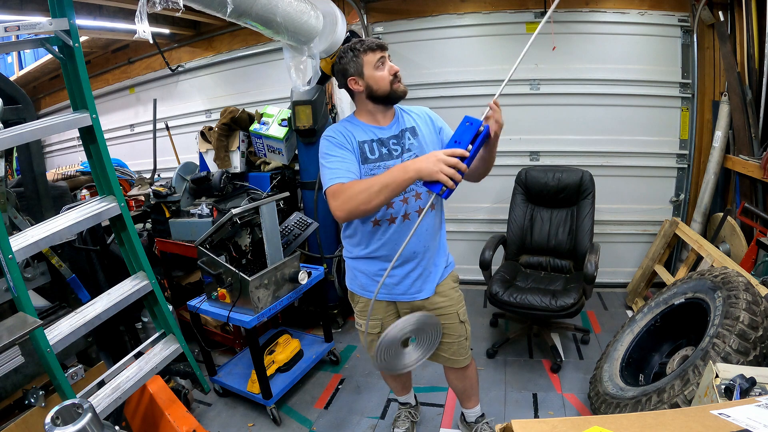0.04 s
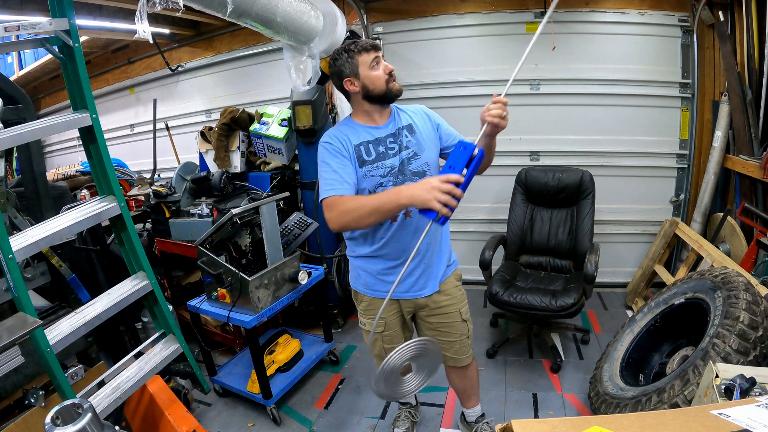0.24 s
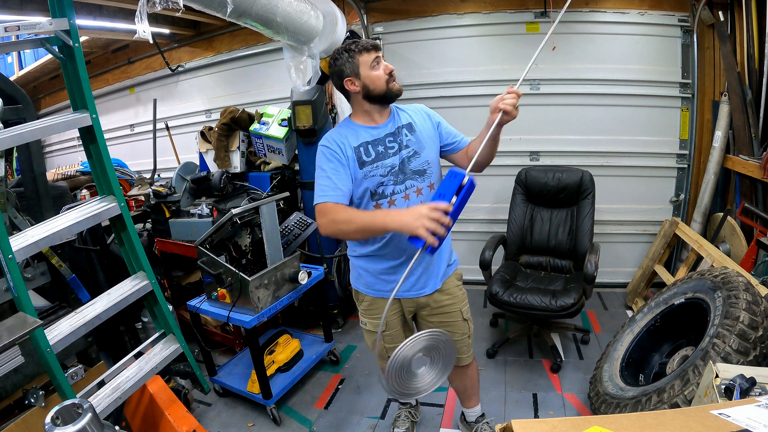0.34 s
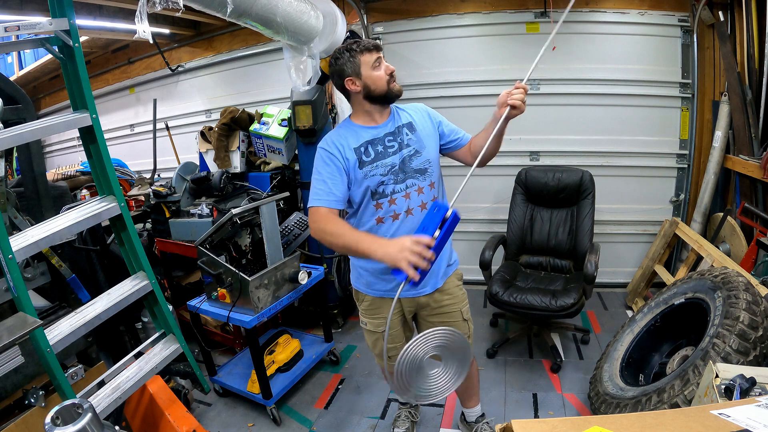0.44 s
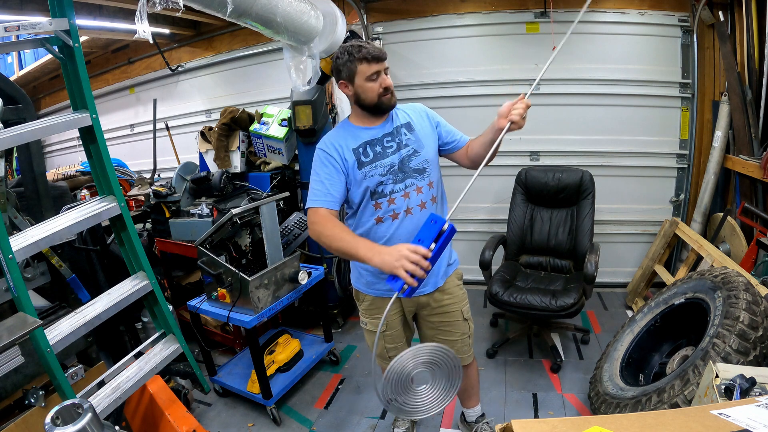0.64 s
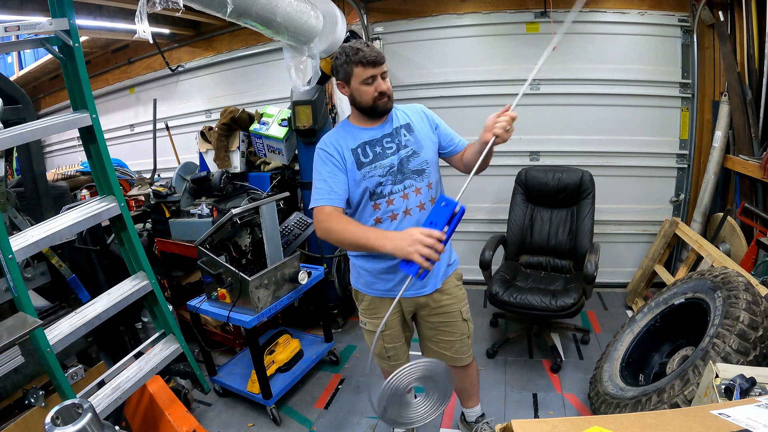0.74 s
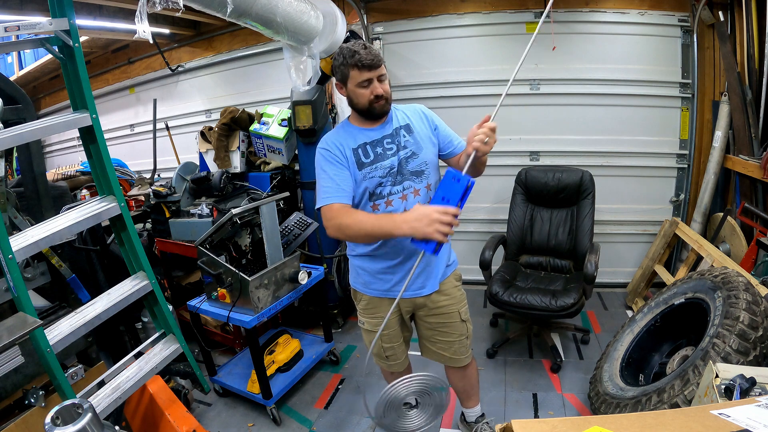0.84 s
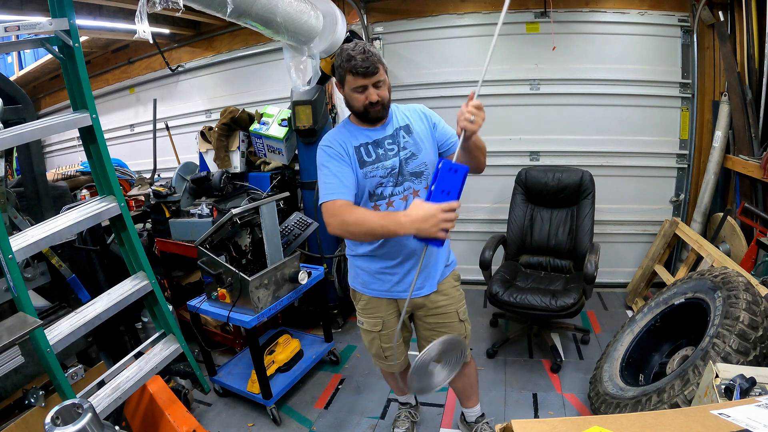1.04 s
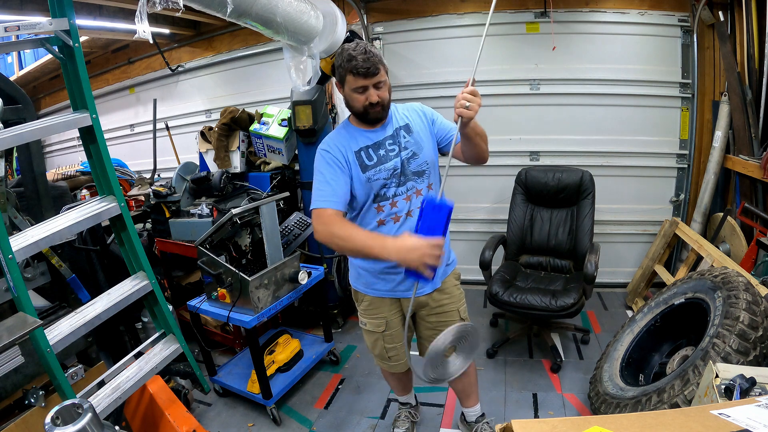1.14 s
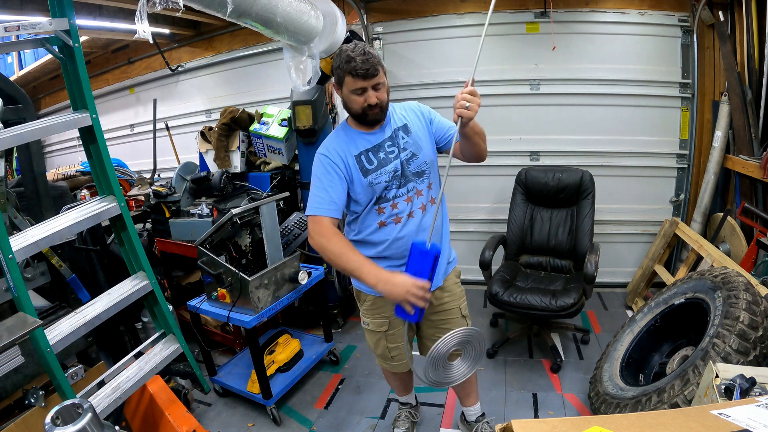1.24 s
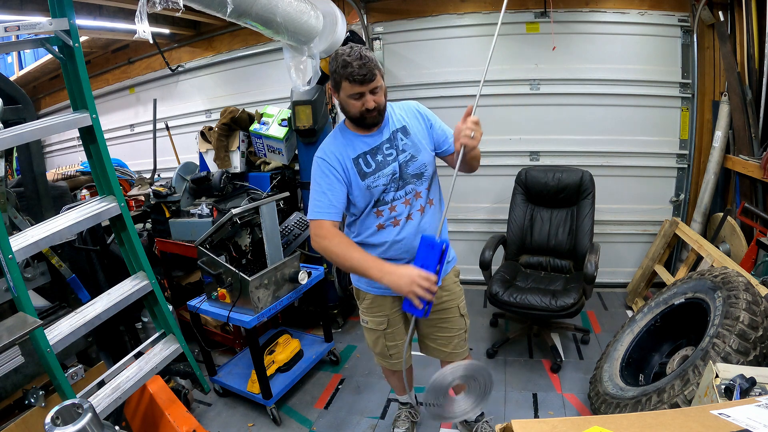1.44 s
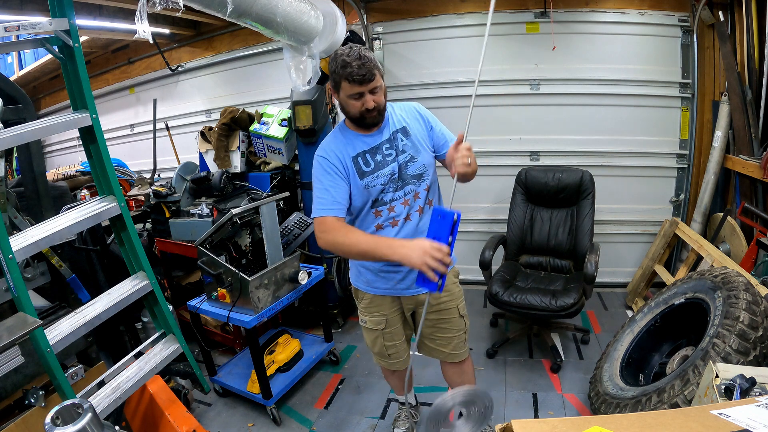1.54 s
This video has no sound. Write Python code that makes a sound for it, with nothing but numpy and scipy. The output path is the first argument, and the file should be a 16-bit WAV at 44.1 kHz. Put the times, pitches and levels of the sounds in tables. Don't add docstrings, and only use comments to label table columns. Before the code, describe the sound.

A hanging coil of thin aluminium tube clatters and rings throughout, in irregular bright clashes, busy around 0.2 to 0.9 seconds, with a sharp clank at 1.03. Rollers scrape grittily along the tube, swelling and easing, with brief squeaks. At 1.17 the tube knocks a sheet-metal door: a low boom with fast bounces, then jangling until 1.3 and quieter scraping. Echoing garage, faint hum, microphones metres away.

```python
import sys
import numpy as np
from scipy import signal
from scipy.fft import rfft, irfft
from scipy.io import wavfile
from scipy.ndimage import uniform_filter1d

SR = 44100
rng = np.random.default_rng(int(sys.argv[2]) if len(sys.argv) > 2 else 0)


def volts_from_db(level):
    exponent = np.asarray(level, float) / 20
    return 10 ** exponent


def generate_wav(sig):
    pcm = np.round(np.clip(np.atleast_2d(sig).T, -1, 1) * 32767).astype(np.int16)
    wavfile.write(sys.argv[1], SR, pcm)


N = 70560


def evened(x):
    return x / np.sqrt(np.mean(x ** 2) + 1e-20)


def read(points, hz):
    f, value = np.transpose(points)
    return np.interp(np.log(hz + 1), np.log(f + 1), value)


def add(mix, s, sound):
    part = mix[round(s * SR):][:len(sound)]
    part += sound[:len(part)]


def colour(x, points):
    gain = volts_from_db(read(points, np.fft.rfftfreq(2 * N, 1 / SR)))
    return irfft(rfft(x, 2 * N) * gain)[..., :N]


def resonate(x, hz, width):
    r = np.exp(-np.pi * width / SR)
    top = [(1 - r * r) / 2, 0, (r * r - 1) / 2]
    return signal.lfilter(top, [1, -2 * r * np.cos(2 * np.pi * hz / SR), r * r], x)


def drift(size):
    return evened(uniform_filter1d(uniform_filter1d(rng.standard_normal(N), size), size))


def air():
    # f/Hz, level/dB
    hum = [(25, -20.5), (60, -15), (98, -36), (140, -12.5), (231, -12.5), (400, -22), (3000, -13),
           (8000, -33.5)]
    a, b = colour(rng.standard_normal((2, N)), hum + [(15000, -66)])
    low = np.std(colour(a, [(90, -60), (100, 0), (400, 0), (440, -60)]))
    return volts_from_db(-62) * np.array([a + .3 * b, a - .3 * b]) / low


def garage(x):
    # f/Hz, t60/s
    decay = [(100, 0.35), (500, 0.52), (1500, 0.45), (4000, 0.32), (10000, 0.17)]
    # f/Hz, likeness 0 to 1
    likeness = [(60, 1), (180, 0.86), (550, 0.89), (1650, 0.82), (4970, 0.65), (15000, 0.92)]
    taps = np.zeros((2, SR // 2))
    at = np.arange(200, SR // 2 - 20, 20)
    at = at + rng.integers(0, 20, (2, len(at)))
    np.put_along_axis(taps, at, rng.choice([-1., 1.], at.shape), 1)
    hz, t, z = signal.stft(taps, SR, nperseg=256)
    same = np.clip(read(likeness, hz) - .15, 0, 1)[:, None]
    z = np.array([z[0], same * z[0] + np.sqrt(1 - same ** 2) * z[1]])
    dying = volts_from_db(-60 * t / read(decay, hz)[:, None])
    tail = signal.istft(z * dying, SR, nperseg=256)[1]
    return signal.fftconvolve(x[None], tail / np.linalg.norm(tail[0]), axes=1)[:, :N]


def door():
    # t/s, level/dB
    knocks = [
        (1.166, -17.5),
        (1.1774, -21.5),
        (1.1972, -22),
        (1.2193, -33.5),
        (1.2381, -27),
    ]
    # f/Hz, level/dB, t60/s
    modes = [(103, -17, 0.15), (129.9, -4, 0.42), (142, -15, 0.38), (169, -1.5, 0.12), (185.3, 1.5, 0.17),
             (198.8, -3, 0.18), (225.4, -2, 0.17), (247, -4.5, 0.25), (267.9, 2.5, 0.16), (285.6, -4, 0.15),
             (330, -41, 0.058), (402, -8.5, 0.089)]
    # t/s, f/Hz, level/dB, rise/s, t60/s
    settle = [
        (1.3, 192, -25.5, 0.015, 0.27),
        (1.365, 205, -40.5, 0.019, 0.29),
        (1.26, 150, -31.5, 0.017, .5),
        (1.42, 170, -43, 0.026, .6),
    ]
    # f/Hz, level/dB
    shake_colour = [(25, -10), (45, -10.5), (80, 2), (110, -9), (150, -34.5)]
    contact_s = 1.163
    t, out = np.arange(30000) / SR, np.zeros(N)

    boom = np.zeros(len(t))
    for hz, db, t60 in modes:
        flap = 4.5 * np.minimum(t / .05, 1) * drift(size=900)[:len(t)]
        boom += volts_from_db(db - 60 * t / min(t60, .5) + flap) * np.sin(2 * np.pi * hz * t)
    blow = np.hanning(round(0.0017 * SR))
    boom = np.convolve(boom, blow / blow.sum())
    boom = signal.lfilter(*signal.butter(4, 118, "high", fs=SR), boom)
    for s, db in knocks:
        add(out, s, -volts_from_db(db) * boom)

    for s, hz, db, rise, t60 in settle:
        add(out, s, np.sin(2 * np.pi * hz * t) * np.minimum(t / rise, 1) * volts_from_db(db - 60 * t / t60))

    shake = evened(colour(rng.standard_normal(N), shake_colour))[:len(t)]
    add(out, contact_s, shake * np.minimum(t / 0.064, 1) * volts_from_db(-28.5 - 60 * t / 0.64))

    # level/dB, f/Hz, width/Hz, t60/s
    tick, body, rap = (-18, 2750, 1300, 0.055), (-27.5, 726, 390, 0.22), (-23, 1640, 570, 0.081)
    for db, hz, width, t60 in (tick, body, rap):
        band = resonate(resonate(rng.standard_normal(len(t)), hz, width), hz, width)
        add(out, contact_s, evened(band) * volts_from_db(db - 60 * t / t60))
    return out


def rollers():
    # t/s, level/dB, brightness/(dB per octave)
    effort = [(0, -52, 8), (.022, -70, 17), (.06, -41.5, -4), (.18, -49, 9), (.3, -37, -0.5),
              (.33, -34.5, 4), (.43, -31, -6.5), (.53, -34, 1), (.6, -40.5, 6), (.8, -33.5, -1),
              (.9, -30.5, 0.5), (.97, -42, 7), (1.028, -37, -13), (1.128, -30.5, 2.5), (1.35, -48, -25),
              (1.446, -54.5, 7), (1.468, -38.5, 5), (1.6, -34.5, -4.5)]
    # f/Hz, level/dB
    scrape_colour = [(180, -57), (300, -10), (781, -14), (1000, -9), (1200, -6.5), (1540, -2), (3130, -0.5),
                     (11700, -15.5), (15500, -69)]
    # f/Hz, width/Hz, level/dB
    tube = [
        (1650, 330, 0),
        (2200, 150, -8),
        (3150, 700, 1),
        (4150, 200, -8),
        (5100, 300, -6),
        (7450, 200, -12),
    ]
    # t/s, low bands/dB, high bands/dB
    answers = [
        (0, -8, -2),
        (.3, -6, 0.5),
        (.5, -8, -8.5),
        (.6, -6, -2.5),
        (.8, -9.5, -9),
        (.93, 0, -7),
        (1.0, -16, -9),
        (1.45, -1.5, -4.5),
        (1.6, -0.5, 1),
    ]
    t = np.arange(N) / SR
    ticks = rng.random(N) < 5000 / SR
    tick_level = volts_from_db(3.5 * np.minimum(rng.exponential(1, N), 3))
    grit = rng.standard_normal(N) * (0.25 + tick_level * ticks)
    grit = grit * volts_from_db(2.5 * drift(size=200))

    at, *answer = np.transpose(answers)
    wall = np.zeros(N)
    for hz, width, db in tube:
        patches = 3 * drift(size=500)
        strength = volts_from_db(db + np.interp(t, at, answer[hz > 2500]) + patches)
        wall += 0.61 * strength * evened(resonate(grit, hz, width))

    sound = evened(colour(grit, scrape_colour)) + volts_from_db(-0.5) * wall
    treble = colour(sound, [(3000, -19), (6000, 0)])
    s, level_db, tilt = np.transpose(effort)
    sound = sound + (volts_from_db(np.interp(t, s, tilt)) - 1) * treble
    return volts_from_db(np.interp(t, s, level_db)) * evened(sound)


def singing():
    # t/s, length/s, f/Hz, level/dB
    songs = [
        (1.235, .05, 4850, -32),
        (.885, .03, 8400, -41),
        (.93, .045, 1640, -40),
        (.49, .045, 1125, -39),
        (.315, .03, 1600, -38),
        (.44, .05, 1650, -36),
        (1.49, .1, 3250, -43),
        (.66, .04, 4800, -37),
    ]
    out = np.zeros(N)
    for s, length, hz, db in songs:
        n = round(length * SR)
        tone = evened(resonate(rng.standard_normal(8000), hz, 65)[-n:])
        swell = np.sin(np.pi * np.arange(len(tone)) / n) ** .6
        add(out, s, volts_from_db(db) * tone * swell)
    return out


def rings():
    # t/s, f/Hz, level/dB, t60/s
    turns = [(.1156, 2930, -40.5, .18), (0.1162, 3370, -34, 0.14), (.1156, 5090, -42, .2),
             (.191, 3600, -25, 0.076), (.191, 5150, -33.5, 0.16), (.191, 7385, -33.5, 0.23),
             (.191, 6390, -31, 0.087), (0.606, 4150, -42, .2), (.6054, 1780, -41, 0.14),
             (0.659, 3150, -39, 0.082), (.66, 8360, -33, .12), (.672, 5050, -32, 0.15),
             (.4543, 4700, -30, 0.14), (.4543, 5150, -31, .12), (.4914, 4200, -29, 0.11),
             (.4914, 3650, -34, 0.09), (1.25, 4890, -29.5, 0.25), (.7571, 4200, -32.5, 0.13),
             (.775, 3650, -33, .15), (.8782, 3700, -32, 0.12), (1.034, 1665, -35, 0.18),
             (1.0339, 2185, -32.5, 0.47), (1.033, 2823, -37.5, 0.26), (1.0339, 3340, -24, .15),
             (1.033, 4100, -36, .2), (1.0339, 5115, -33, 0.24), (1.0335, 7472, -37, 0.3),
             (1.033, 9550, -44, .06), (1.0339, 11300, -27, .08), (1.0339, 12300, -35, 0.077),
             (1.2879, 2700, -35.5, 0.23), (1.2882, 1654, -31, 0.09)]
    t, out = np.arange(12000) / SR, np.zeros(N)
    for s, hz, db, t60 in turns:
        gap, phase = rng.random(2)
        second_hz = hz + 60 * (2 * gap - 1)
        pair = np.sin(2 * np.pi * hz * t) + 0.83 * np.sin(2 * np.pi * (second_hz * t + phase))
        rasp = 4 * drift(size=90)[:len(t)]
        add(out, s, pair * np.minimum(t / .002, 1) * volts_from_db(db - 60 * t / t60 + rasp))
    return out


def coil(count=800):
    # t/s, level/dB, brightness/(dB per octave), chatter/s
    clashes = [(0.024, -26.5, -2, 0.003), (0.0497, -27.5, -1.5, 0.0061), (0.1155, -21, -2.5, 0.0071),
               (0.191, -14.5, 2.5, 0.004), (0.2677, -26, 0.5, 0.0072), (0.3029, -23.5, -3.5, 0.0055),
               (0.4371, -15.5, 2, 0.014), (0.4543, -17.5, -0.5, 0.0079), (0.4918, -13.5, 1, 0.0082),
               (0.5088, -65, -22, 0.0094), (0.6055, -18.5, 2, 0.013), (0.6394, -19, -0.5, 0.013),
               (0.66, -14, 5, 0.0051), (0.6791, -18.5, -1, 0.0056), (0.7568, -21.5, -1.5, 0.015),
               (0.8672, -23.5, 0, 0.0068), (0.8782, -17.5, 2, 0.0085), (0.9563, -42, 0, 0.0087),
               (0.994, -34, 0, 0.0054), (1.0339, -8.5, 2, 0.0056), (1.1714, -12.5, 4, 0.015),
               (1.1916, -17, -1, 0.048), (1.242, -10.5, 0, 0.015), (1.2544, -13.5, 6.5, 0.011),
               (1.2877, -13.5, 5, 0.0081), (1.306, -24, -5.5, 0.013), (1.4608, -26.5, -4, 0.0044),
               (1.4831, -24.5, -5, 0.013), (1.5694, -26.5, -4.5, 0.0088), (1.5833, -26, 2.5, 0.014)]
    # f/Hz, level/dB, t60/s
    strong_modes = [(1668, 0, 0.21), (2220, -21, 0.53), (2720, 4, 5.0), (3500, -2, 0.22), (3840, -11, 1.9),
                    (4030, 9, 0.029), (4800, -22, 0.2), (4610, 5, 0.19), (5570, -31, 0.39),
                    (6600, -29, 0.13), (7540, 5.5, 0.34), (7790, -7, 0.1), (9550, 0.5, 0.028),
                    (10900, -15, 0.28)]
    # f/Hz, level/dB
    weak_colour = [(290, -60), (500, -22), (1650, 1.5), (2540, -0.5), (3330, 5), (3850, 3), (5050, 3.5),
                   (11600, -4), (15500, -19.5)]
    # f/Hz, t60/s
    weak_ring = [(800, 0.14), (3000, 0.11), (8000, 0.1), (14000, 0.029)]
    t, out = np.arange(9000) / SR, np.zeros(N)
    weak = np.linspace(600, 15500, count) + rng.uniform(-9, 9, count)
    strong = np.transpose(strong_modes)
    hz = np.r_[weak, strong[0]]
    db = np.r_[read(weak_colour, weak), 8 + strong[1]]
    t60 = np.r_[read(weak_ring, weak), np.clip(strong[2], .05, .14)]
    modes = np.sin(2 * np.pi * hz[:, None] * t) * volts_from_db(-60 * t / t60[:, None])
    for s, level_db, tilt, chatter in clashes:
        spread = 1.5 * rng.standard_normal(len(hz))
        sign = rng.choice([-1, 1], len(hz))
        hits = rng.random(3000) < 3500 / SR
        force = 0.61 * rng.uniform(-1, 1, 3000)
        train = hits * force * np.exp(-(t[:3000] / max(chatter, .001)) ** 2)
        train[0] = min(1, 0.023 / chatter)
        power = uniform_filter1d(abs(rfft(train, 4096)) ** 2, size=25)
        push = np.interp(hz * 4096 / SR, np.arange(2049), power)
        ring = (sign * volts_from_db(db + spread + tilt * np.log2(hz / 4000)) / np.sqrt(push)) @ modes
        sound = signal.fftconvolve(train, ring)
        add(out, s, volts_from_db(level_db - 9.5) * sound / np.sqrt(np.mean(sound[:600] ** 2)))
    return out


def scene():
    # f/Hz, level/dB
    door_wet = [
        (60, -20),
        (160, -17),
        (300, -21),
        (500, -8),
        (800, -6),
    ]
    steep = signal.butter(3, 500, "high", fs=SR)
    metal = signal.lfilter(*steep, coil() + rings() + rollers() + singing())
    boom = door()
    turn = np.pi * 9 * np.arange(N) / SR
    wet = np.zeros((2, N))
    for k in range(3):
        wet += garage(np.sqrt(2 / 3) * np.cos(turn + np.pi * k / 3) * metal)
    return volts_from_db(-2.5) * metal + boom + volts_from_db(-4) * wet + garage(colour(boom, door_wet)) + air()


def roll_off(x):
    return signal.sosfilt(signal.butter(12, 15990, fs=SR, output="sos"), x)


def record(dry):
    # f/Hz, level difference/dB
    lean = [(60, -1), (180, -2.3), (500, -0.5), (1300, -2.1), (4970, -1.6), (9000, 2.2), (14000, 1)]
    # f/Hz, level/dB
    edge = [(13500, -1), (15000, -10.5), (15900, -14), (16100, -34), (16700, -60)]
    late = np.roll(dry.mean(0), 400)
    top = volts_from_db(-4) * colour(late, [(9000, -30), (12500, 0)])
    ports = []
    for k, side in enumerate((1, -1)):
        half_lean = [(hz, side * db / 2) for hz, db in lean]
        ports.append(colour(dry[k] + side * top, half_lean))
    return roll_off(colour(np.array(ports), edge))


dry = scene()
out = record(dry)
generate_wav(out)
```